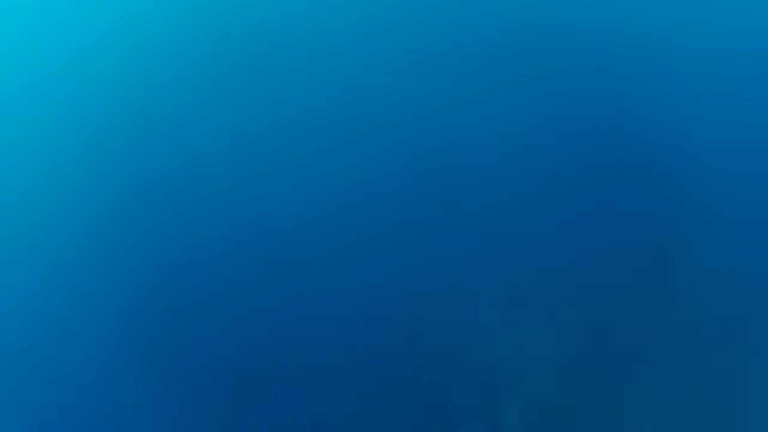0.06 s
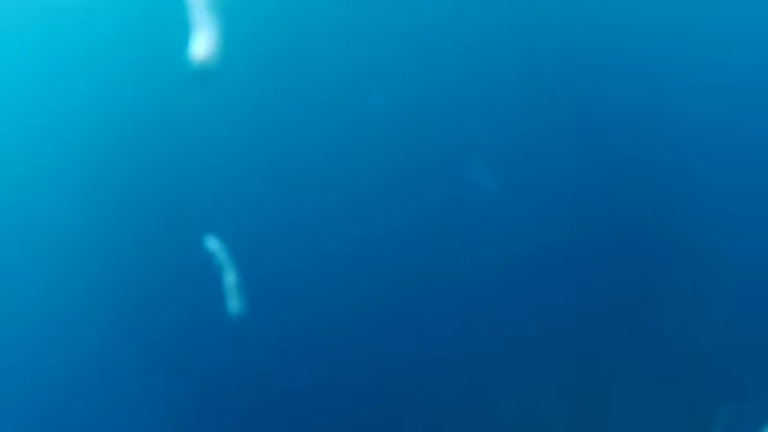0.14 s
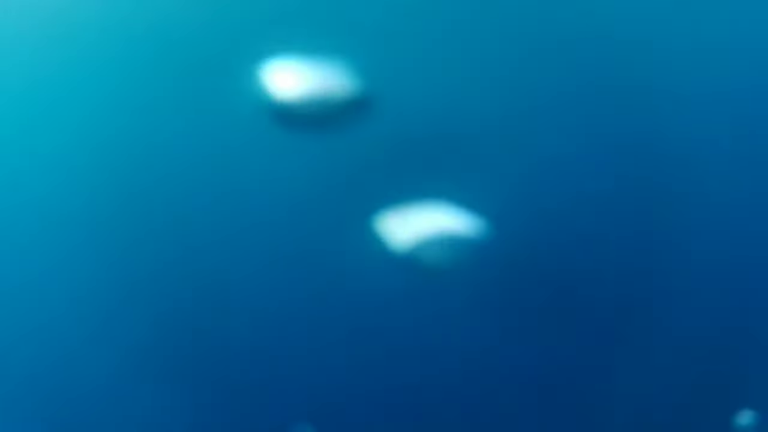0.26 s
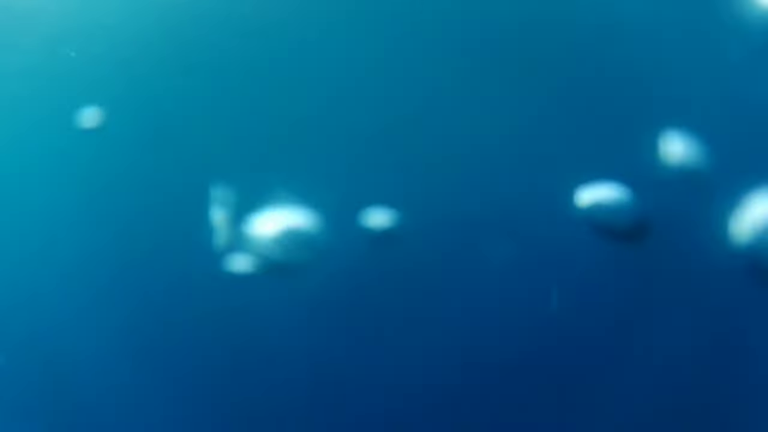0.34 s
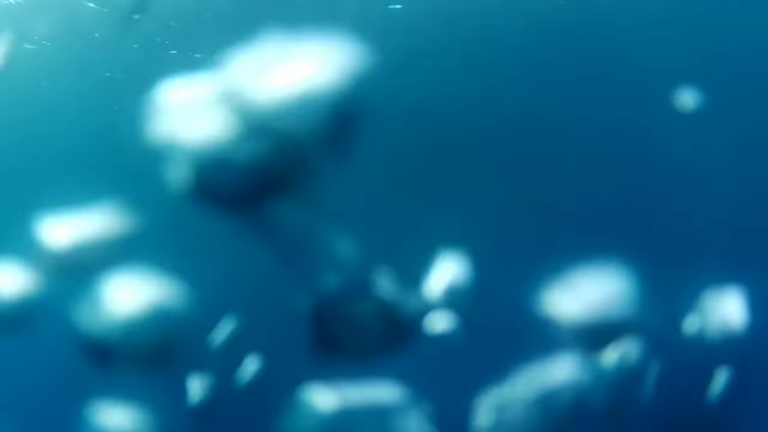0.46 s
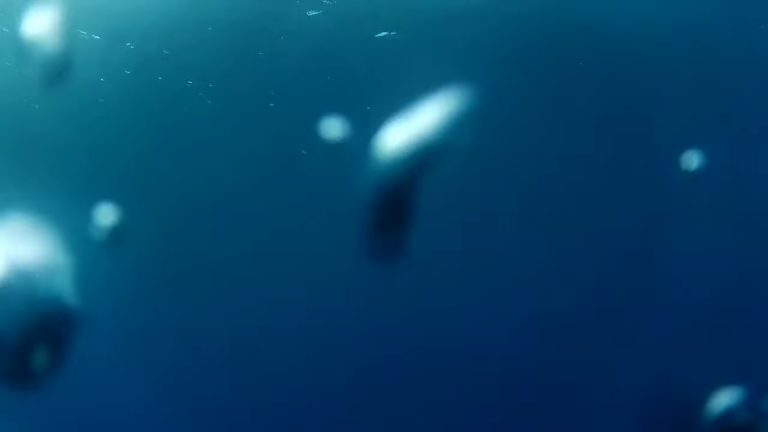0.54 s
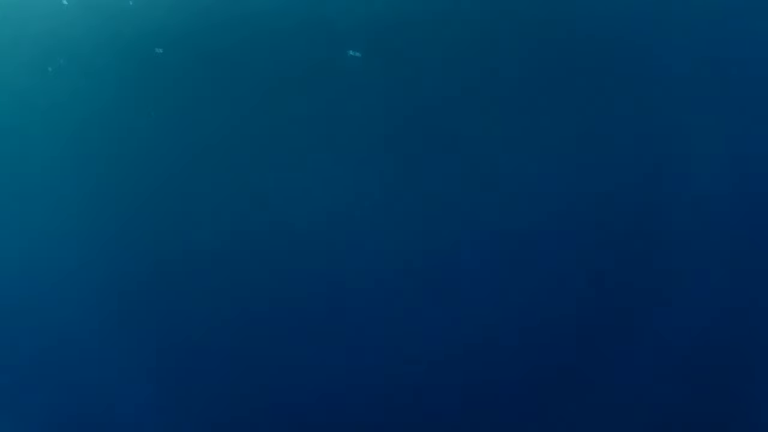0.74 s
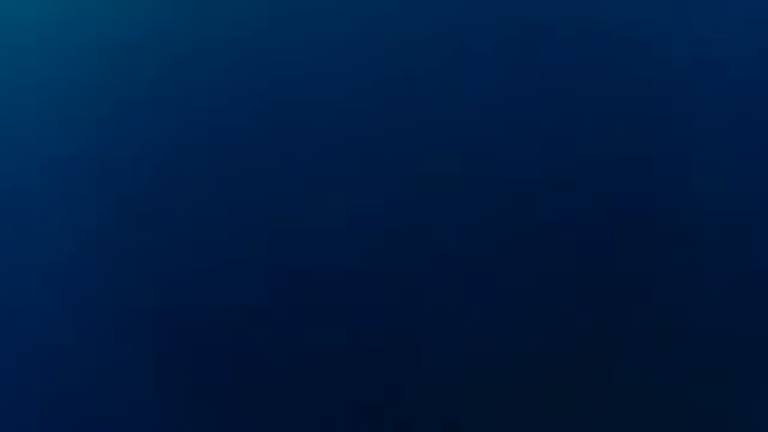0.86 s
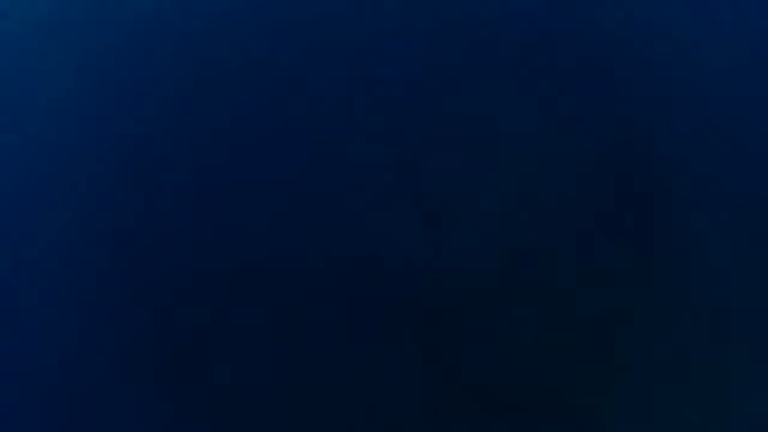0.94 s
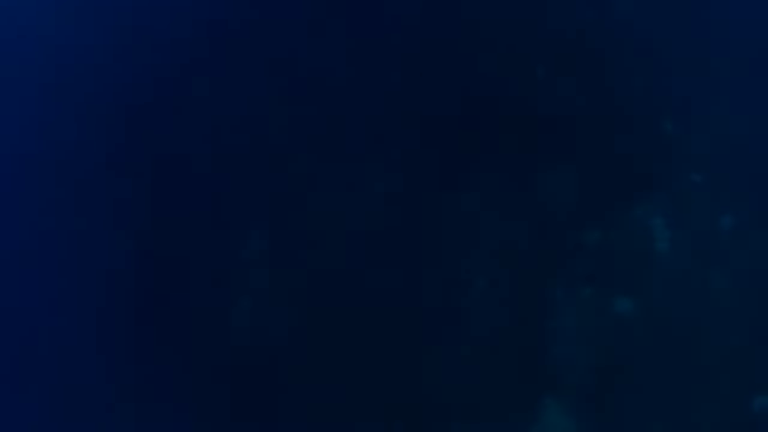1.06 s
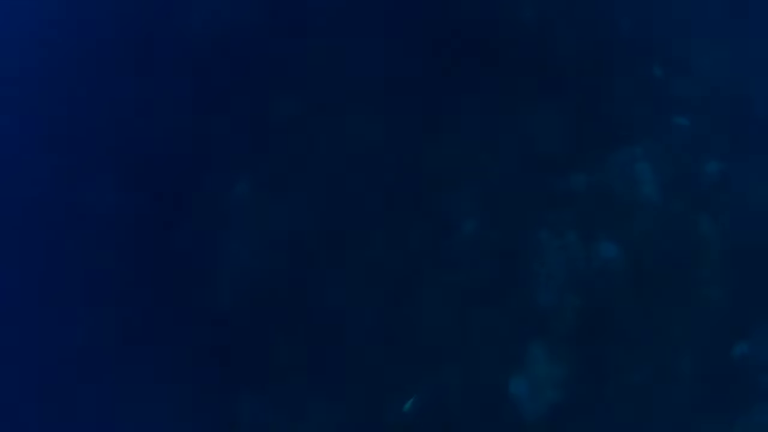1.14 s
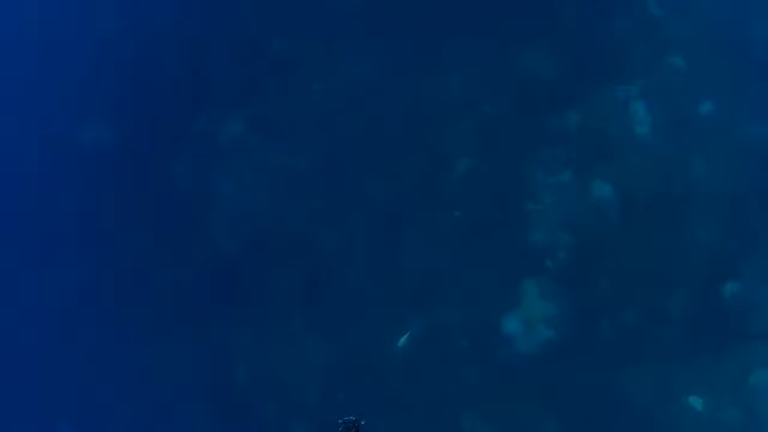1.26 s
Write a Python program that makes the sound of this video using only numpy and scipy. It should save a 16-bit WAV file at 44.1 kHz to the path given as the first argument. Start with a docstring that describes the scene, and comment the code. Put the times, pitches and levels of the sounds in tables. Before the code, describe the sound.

Underwater bubbles gurgle in uneven spurts, with tiny clicks and one sharp knock.

```python
"""Under water, beside a camera in its case, air escapes in spurts while a swimmer rises.
Each bubble rings like a tiny bell as it breaks free: big ones gurgle, and a swarm of small ones
follows and thins out. Tiny ones tick and pop on the case. Water bumps and slaps the case,
hardest near the end. Behind it all are a low wash and a faint fizz that wanders down in pitch."""
import sys
import numpy as np
from scipy import signal
from scipy.fft import rfft, irfft
from scipy.io import wavfile
from scipy.ndimage import uniform_filter1d

SR = 44100
rng = np.random.default_rng(int(sys.argv[2]) if len(sys.argv) > 2 else 0)


def transcribe(u):
    """Save the signal u as a 16-bit wav file named by the first command-line argument.

    u: samples, shape (n,) or (channels, n), limited to [-1, 1]; the rate is SR.
    q: integer samples, one column per channel.
    """
    v = np.clip(np.atleast_2d(u).T, -1, 1)
    q = np.round(v * 32767).astype(np.int16)
    wavfile.write(sys.argv[1], SR, q)


N = 57330

# how loud the swarm of large bubbles is over time: t/s, level/dB
GURGLE_LEVEL = [(0, -66.5), (.08, -67), (.2, -59), (.26, -43.5), (.32, -46), (.41, -58.5), (.52, -50.5),
                (.62, -55), (.68, -67.5), (.73, -55.5), (.79, -67.5), (.95, -67), (1.05, -50.5),
                (1.12, -62), (1.18, -93.5), (1.3, -86.5)]


def from_db(db):
    """Turn decibels into a number to multiply a sound by."""
    return 10 ** (np.asarray(db) / 20)


def rms_one(x):
    """Scale a sound so that its average strength (rms) is 1."""
    return x / np.sqrt(np.mean(x ** 2) + 1e-20)


def in_time(rows):
    """Join a table's points with straight lines, giving a value for every sample."""
    times, *columns = np.transpose(rows)
    return [np.interp(np.arange(N) / SR, times, column) for column in columns]


def add(out, start_s, sound):
    """Mix a sound in at its start time."""
    i = int(np.clip(start_s * SR, 0, N - 1))
    out[i:i + len(sound)] += sound[:N - i]


def low_cut(x, hz, order):
    """Take away the bass below hz."""
    return signal.sosfilt(signal.butter(order, hz, "high", fs=SR, output="sos"), x + 1e-18)


def noise(spectrum):
    """Noise whose lows and highs follow a table of f/Hz, level/dB."""
    hz, db = np.transpose(spectrum)
    bins_hz = np.maximum(np.arange(N // 2 + 1) * SR / N, 1)
    gain = from_db(np.interp(np.log(bins_hz), np.log(hz), db))
    return rms_one(irfft(rfft(rng.standard_normal(N)) * gain, N))


def ring(hz, t60, swell_s):
    """A note that swells, climbs a little in pitch and fades by 60 dB in t60 seconds."""
    t = np.arange(int(1.5 * t60 * SR) + 2) / SR
    envelope = (1 - np.exp(-(t / swell_s) ** 2)) * np.exp(-np.log(1000) * t / t60)
    rise = 0.013 * t / t60   # the pitch gains 1.3 % every t60
    return envelope / (envelope.max() + 1e-12) * np.sin(2 * np.pi * hz * t * (1 + .5 * rise))


def bubble(hz, t60):
    """A pocket of air rings, swelling for 3/4 of a cycle plus the time its neck takes to close."""
    return ring(hz, t60, swell_s=0.75 / hz + 0.00046)


def swarm(level, per_s, low_hz, high_hz, t60_at_1khz):
    """Many random bubbles of similar size; together their loudness follows the flow of air."""
    out = np.zeros(N)
    for when, pitch, strength, sign in rng.random((int(per_s * N / SR), 4)):
        hz = low_hz * (high_hz / low_hz) ** pitch
        t60 = t60_at_1khz * np.sqrt(1000 / hz)   # higher notes die sooner
        boost_db = min(-4 * np.log(1 - strength), 12)   # a few are much louder than the rest
        add(out, when * N / SR, from_db(boost_db) * np.sign(sign - .5) * bubble(hz, t60))
    power = uniform_filter1d(out ** 2, size=1500)
    evened_out = out / np.sqrt(np.abs(power) + 0.043 * power.mean())
    return evened_out * from_db(in_time(level)[0])


def bubble_swarms():
    """Escaping air breaks into bubbles of four sizes: the smaller they are, the higher they ring."""
    # how loud the three smaller sizes are over time: t/s, level/dB
    medium_level = [(0, -66), (.08, -79), (.12, -56.5), (.18, -63.5), (.25, -49), (.32, -42.5),
                    (.39, -50.5), (.45, -50.5), (.51, -45.5), (.6, -50.5), (.65, -57), (.74, -60),
                    (.79, -70.5), (.95, -67), (1.04, -61), (1.11, -56.5), (1.16, -76), (1.3, -73)]
    small_level = [(0, -67), (.08, -79.5), (.16, -76), (.21, -61), (.25, -73), (.31, -62.5), (.39, -62),
                   (.47, -68), (.56, -59.5), (.65, -74), (.74, -78), (.79, -80), (1.0, -81), (1.05, -73),
                   (1.15, -85), (1.3, -101)]
    finest_level = [(0, -95), (.2, -86), (.3, -71.5), (.38, -83), (.57, -78.5), (.66, -87), (.8, -104)]
    return (swarm(GURGLE_LEVEL, per_s=590, low_hz=443, high_hz=994, t60_at_1khz=0.021)
            + swarm(medium_level, per_s=2700, low_hz=1016, high_hz=2286, t60_at_1khz=0.021)
            + swarm(small_level, per_s=1400, low_hz=2240, high_hz=3825, t60_at_1khz=0.035)
            + swarm(finest_level, per_s=1000, low_hz=4050, high_hz=8300, t60_at_1khz=0.012))


def fizz():
    """Two narrow bands of faint hiss glide about; the lower one ends far below where it began."""
    # the middle pitch and loudness of each band: t/s, f/Hz, level/dB
    low_band = [(0, 3916, -57.5), (.06, 3420, -95), (.15, 2087, -69), (.45, 2645, -88.5),
                (.62, 3550, -77.5), (.76, 3233, -75), (.9, 2887, -68.5), (.99, 2410, -79.5),
                (1.08, 1900, -69.5), (1.19, 1780, -67), (1.3, 1700, -73.5)]
    high_band = [(0, 4400, -67), (.1, 3990, -96.5), (.4, 4540, -78), (.78, 4910, -104.5),
                 (.87, 4730, -84.5), (1.04, 4690, -81), (1.3, 4390, -99)]
    out, width_hz = np.zeros(N), 350
    smooth = signal.butter(2, width_hz / 2, fs=SR, output="sos")
    for band in (low_band, high_band):
        hz, db = in_time(band)
        a, b = signal.sosfilt(smooth, rng.standard_normal((2, N)))
        phase = 2 * np.pi * np.cumsum(hz) / SR
        out += from_db(db) * rms_one(a * np.cos(phase) + b * np.sin(phase))   # lifts the noise to hz
    return out


def water_wash():
    """Water washes over the case in step with the gurgle, above a steady faint hiss."""
    # how strong each pitch is within the wash and within the hiss: f/Hz, level/dB
    wash_spectrum = [(25, -6.5), (60, -1), (130, 0), (220, -3), (400, 8), (800, -7.5), (3000, -56)]
    hiss_spectrum = [(25, 0.5), (100, -5.5), (300, -5.5), (600, 5.5), (1100, 14.5), (2000, 2.5), (3000, 9),
                     (4000, -4.5), (6000, -5), (10000, -5.5), (16000, -5)]
    wash = from_db(in_time(GURGLE_LEVEL)[0] - 26) * noise(wash_spectrum)
    return wash + from_db(-78) * noise(hiss_spectrum)


def single_bubbles():
    """Some bubbles stand out as they pinch off; their shape wobbles, so their loudness wavers."""
    # one row per bubble: t/s, f/Hz, level/dB, t60/s
    notes = [(.005, 3530, -60.5, 0.11), (.014, 843, -54, 0.084), (0.0288, 1307, -52, 0.045),
             (0.0409, 1895, -42.5, 0.023), (0.0666, 816, -53, 0.026), (0.095, 1857, -37, 0.032),
             (0.097, 810, -47, 0.025), (0.1082, 837, -40, 0.021), (0.109, 1763, -38, 0.1),
             (0.1243, 2060, -36, 0.022), (0.1542, 1320, -37, 0.036), (.157, 436, -42, 0.027),
             (.166, 600, -40.5, 0.014), (.192, 2000, -40, 0.028), (0.192, 1315, -46.5, 0.065),
             (0.201, 2650, -43.5, 0.052), (.2125, 2110, -37, 0.0094), (.213, 2900, -44, 0.018),
             (.225, 573, -35.5, 0.02), (.2425, 1480, -34.5, 0.016), (.242, 553, -39, 0.16),
             (0.2676, 707, -22, 0.03), (0.281, 3420, -39, 0.017), (0.277, 1416, -39, 0.064),
             (.2848, 645, -22, 0.054), (0.2857, 521.3, -25, 0.13), (.2935, 733, -29.5, 0.03),
             (.295, 1416, -30.5, 0.04), (.3085, 2353, -40.5, 0.029), (.306, 551, -25, 0.11),
             (0.3114, 1846, -27.5, 0.039), (.316, 2170, -37, 0.03), (.339, 842, -37.5, 0.067),
             (.332, 1443, -38.5, 0.039), (.341, 1336, -33.5, 0.054), (.366, 1259, -45, 0.27),
             (.348, 523, -31, 0.16), (0.371, 1680, -37.5, 0.028), (.373, 850, -39, 0.033),
             (.385, 517, -37.5, 0.17), (.412, 850, -44, .04), (0.42, 1517, -33, 0.035),
             (0.422, 499, -42, 0.098), (.4435, 798, -39.5, 0.035), (0.452, 2740, -43, 0.02),
             (0.474, 1670, -35, 0.032), (0.472, 2450, -42.5, 0.035), (.485, 1870, -37.5, 0.021),
             (0.496, 1180, -35, 0.0084), (0.5131, 1610, -33.5, 0.019), (.513, 4140, -54, 0.015),
             (0.5272, 1630, -33.5, 0.027), (.536, 3680, -50.5, .016), (0.55, 3970, -40.5, 0.01),
             (0.548, 1415, -38.5, 0.026), (.5825, 4030, -54, 0.0096), (0.587, 2380, -43, 0.026),
             (0.591, 1468, -36, 0.023), (.6112, 634, -34, 0.0069), (0.6116, 1319, -36, 0.056),
             (0.6134, 1820, -36.5, 0.035), (0.617, 1130, -35, 0.025), (.628, 4520, -65, 0.02),
             (0.631, 1643, -39.5, 0.023), (.674, 2118, -40, 0.037), (0.698, 1230, -45, 0.036),
             (0.697, 480, -46, 0.022), (0.7121, 1910, -36.5, 0.0056), (0.7134, 950, -40.5, 0.031),
             (.733, 1742, -41.5, 0.042), (.7335, 2200, -50.5, 0.047), (.749, 580, -47.5, 0.011),
             (0.853, 1508, -49, 0.049), (0.875, 460, -39, 0.012), (0.8757, 890, -47.5, 0.008),
             (0.888, 490, -46, 0.0081), (.916, 448, -43.5, 0.019), (.917, 890, -50, .014),
             (.9665, 1405, -50.5, 0.073), (0.9667, 501, -44.5, 0.024), (1.006, 497, -36, 0.029),
             (1.013, 1582, -38.5, 0.11), (1.0228, 598, -30.5, 0.024), (1.024, 2070, -39.5, 0.015),
             (1.0305, 605, -22.5, 0.043), (1.0316, 1480, -33.5, 0.038), (1.033, 2090, -32.5, 0.0071),
             (1.0362, 1720, -29, 0.016), (1.0411, 3500, -42, 0.0094), (1.043, 3120, -43.5, 0.02),
             (1.043, 598, -32, .02), (1.060, 498, -36.5, 0.021), (1.089, 3540, -46.5, 0.014),
             (1.089, 1630, -37.5, 0.006), (1.1061, 1180, -38, 0.0037), (1.1225, 2020, -42.5, 0.023),
             (1.16, 605, -60.5, 0.022)]
    wobble_hz, wobble_db = 85, 2.73
    out, max_samples = np.zeros(N), SR // 3
    smooth = signal.butter(4, wobble_hz, fs=SR, output="sos")
    for start_s, hz, db, t60 in notes:
        note = bubble(hz, t60)[:max_samples]
        wobble = rms_one(signal.sosfilt(smooth, rng.standard_normal(max_samples)))
        add(out, start_s, from_db(db + wobble_db * wobble[:len(note)]) * note)
    return out


def crack(low_hz, high_hz, decay_s, order):
    """A very short burst of noise between two pitches."""
    t = np.arange(SR // 100) / SR
    band = signal.butter(order, [low_hz, high_hz], "band", fs=SR, output="sos")
    return signal.sosfilt(band, rng.standard_normal(len(t)) * np.exp(-t / decay_s))


def ticks():
    """Tiny bubbles hit the case, each with a bright crack and a very high ring."""
    # one row per tick: t/s, f/Hz, ring level/dB, crack level/dB
    hits = [(0.021, 6140, -56.5, -70), (.042, 6900, -40, -74), (0.042, 3610, -41.5, -59.5),
            (.148, 10000, -64, -66), (0.155, 12600, -61, -54), (0.1922, 6650, -54.5, -63),
            (.193, 4440, -52.5, -68), (0.202, 5960, -63, -66), (0.213, 6830, -44, -51.5),
            (0.292, 6900, -55, -65), (.316, 7850, -61, -73.5), (.436, 4970, -60, -57),
            (0.4582, 7460, -52, -57), (0.4664, 7100, -53, -47.5), (.509, 9230, -65.5, -56),
            (0.5528, 7200, -64.5, -58), (.7128, 7100, -58.5, -81), (0.719, 6660, -68, -82),
            (0.9297, 6660, -60.5, -70), (1.0162, 6500, -78, -60)]
    out = np.zeros(N)
    for start_s, hz, ring_db, crack_db in hits:
        add(out, start_s, from_db(ring_db) * ring(hz, t60=0.0078, swell_s=0.00046))
        add(out, start_s, from_db(crack_db) * crack(3400, 9500, decay_s=0.0012, order=3))
    return out


def pops():
    """Small bubbles burst against the case with a dry snap."""
    # one row per burst: t/s, level/dB
    bursts = [(0.0431, -49), (0.1928, -51), (.2865, -46), (0.55, -38.5), (.7128, -42), (0.9279, -47),
              (1.024, -44), (1.0335, -38), (1.088, -49.5)]
    out = np.zeros(N)
    for start_s, db in bursts:
        add(out, start_s, from_db(db) * crack(910, 3680, decay_s=0.0026, order=4))
    return out


def bumps():
    """Moving water nudges the case with faint, dull knocks."""
    # one row per knock: t/s, level/dB
    nudges = [(0.167, -72), (0.276, -70.5), (0.448, -79.5), (0.815, -76)]
    out = np.zeros(N)
    for start_s, db in nudges:
        add(out, start_s, from_db(db) * ring(hz=130, t60=0.058, swell_s=0.0029))
    return out


def slaps():
    """Water slaps the case with short knocks; the hardest also shakes it into a low thud."""
    # one row per slap: t/s, f/Hz, level/dB
    hits = [(0.2859, 1100, -31.5), (1.0243, 1088, -36), (1.031, 937, -19)]
    # the low notes of the shaken case: f/Hz, relative level/dB, t60/s
    case_notes = [(128, -15, 0.044), (270, -3.5, 0.038), (362, 0, 0.042)]
    thud_start_s, thud_db, swell_s = 1.030, -37.5, 0.00038
    out = np.zeros(N)
    for start_s, hz, db in hits:
        add(out, start_s, from_db(db) * ring(hz, t60=0.012, swell_s=swell_s))
    for hz, db, t60 in case_notes:
        add(out, thud_start_s, from_db(thud_db + db) * ring(hz, t60, swell_s))
    return out


def scene():
    """All the sounds meet at one microphone; little bass from the bubbles and slaps reaches it."""
    air = low_cut(bubble_swarms() + single_bubbles(), hz=385, order=4)
    knocks = bumps() + low_cut(slaps(), hz=110, order=2)
    return (air + knocks + ticks() + pops() + fizz() + water_wash())[None]


def record(dry):
    """Cut away the highest treble, above 15700 Hz."""
    return signal.sosfilt(signal.ellip(10, .1, 70, 15700, fs=SR, output="sos"), dry)


dry = scene()
out = record(dry)
transcribe(out)
```